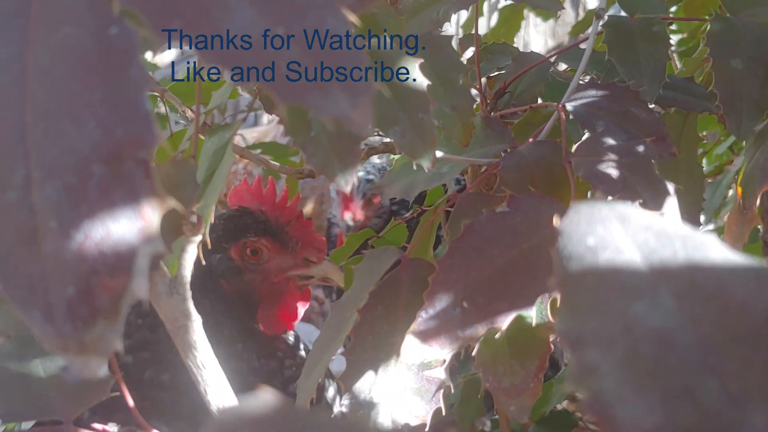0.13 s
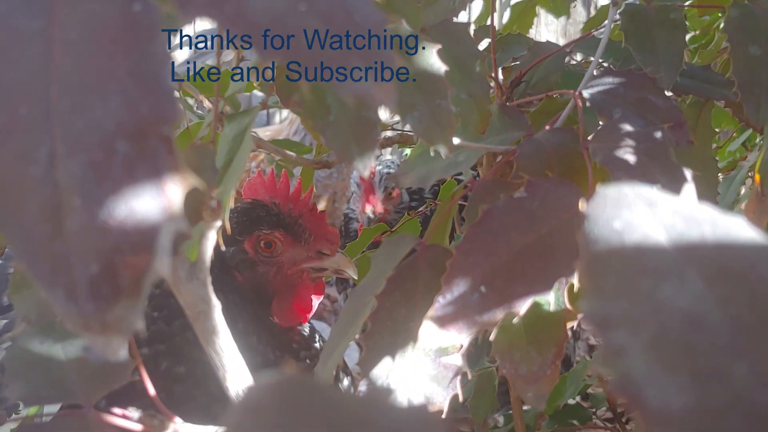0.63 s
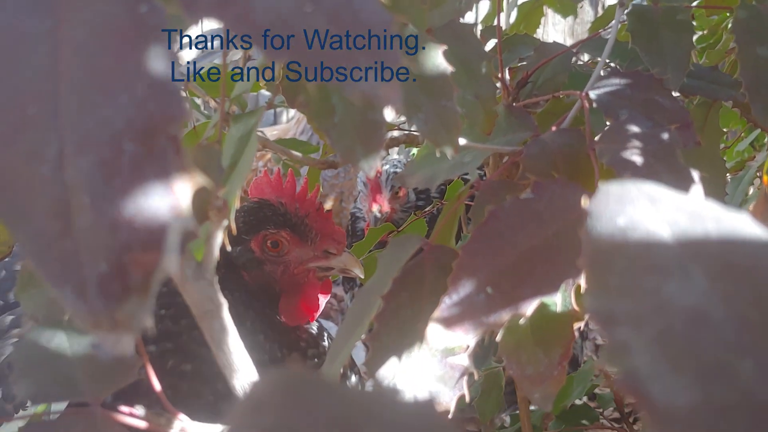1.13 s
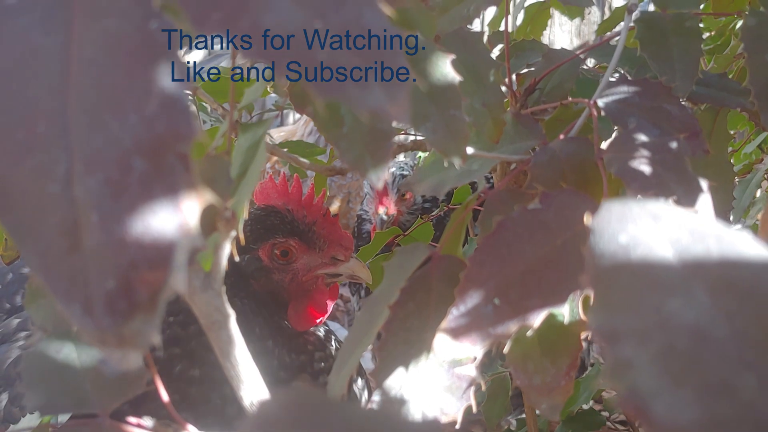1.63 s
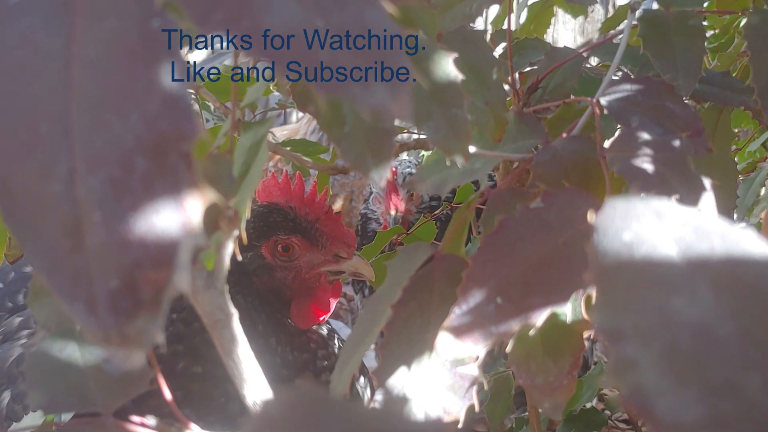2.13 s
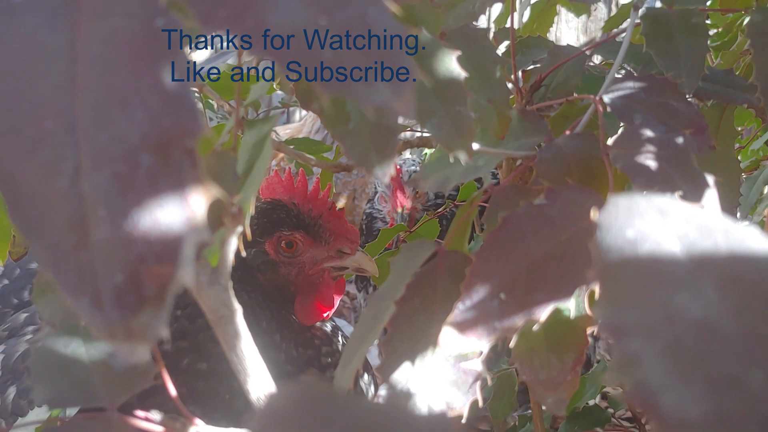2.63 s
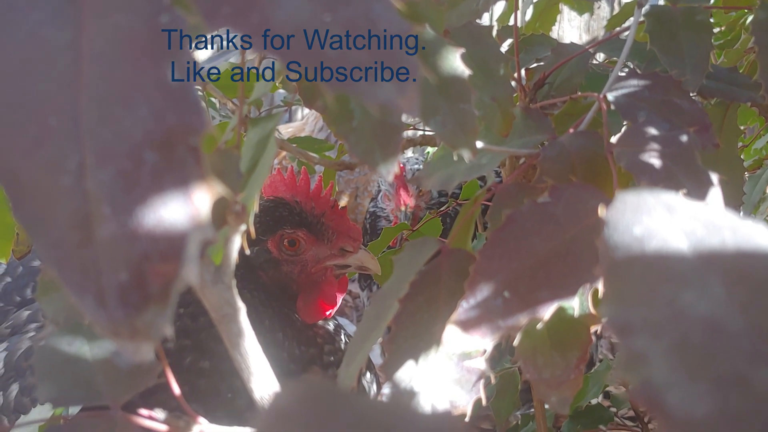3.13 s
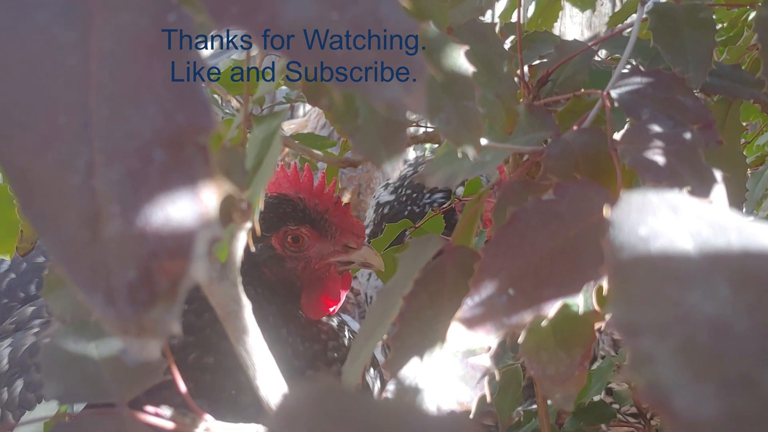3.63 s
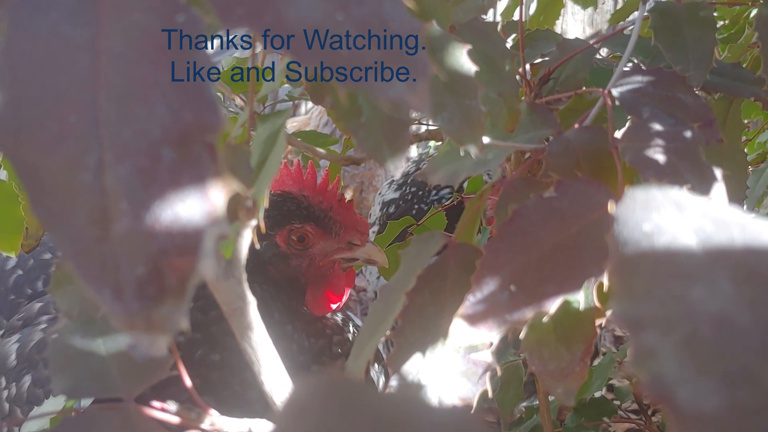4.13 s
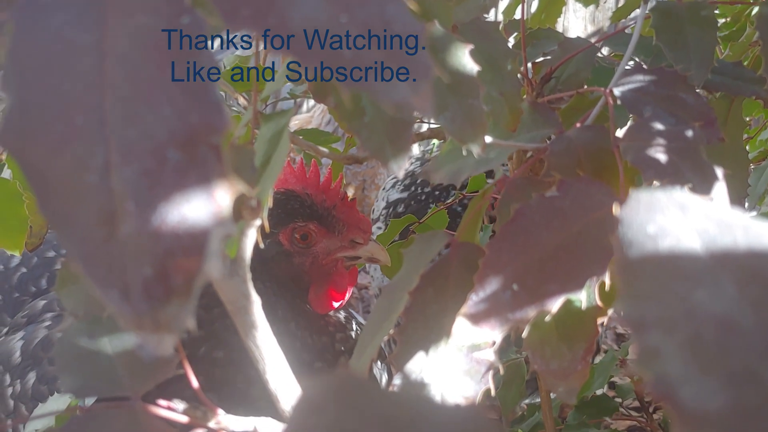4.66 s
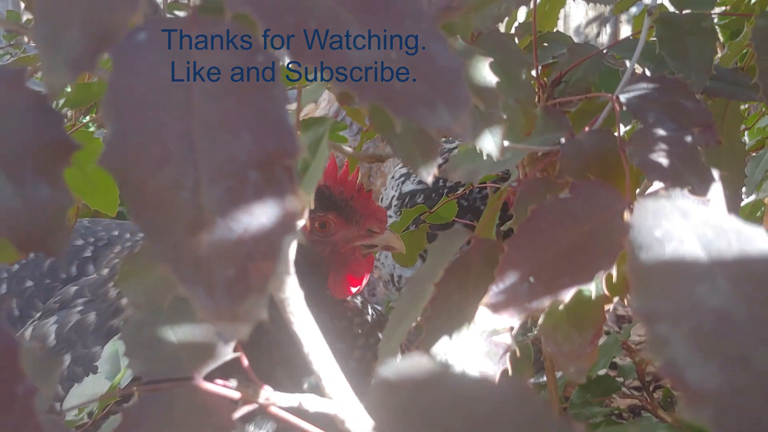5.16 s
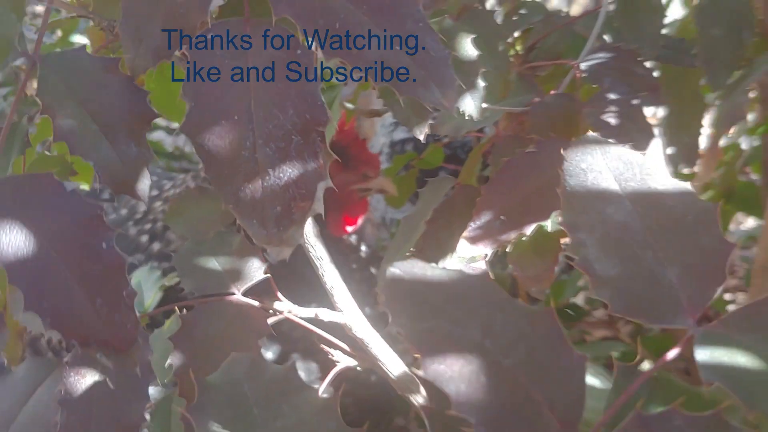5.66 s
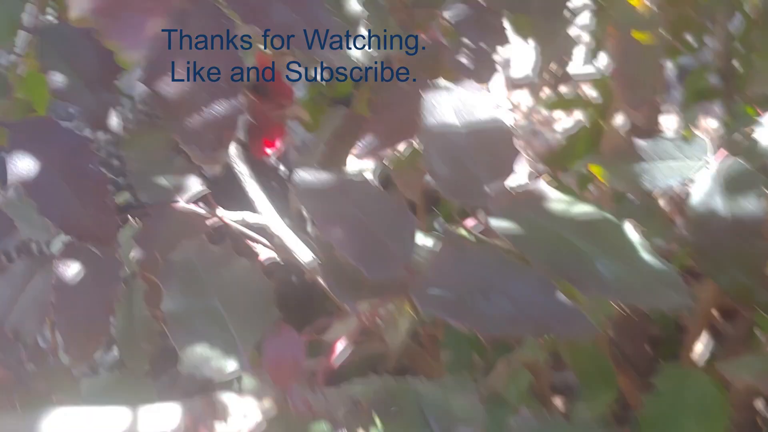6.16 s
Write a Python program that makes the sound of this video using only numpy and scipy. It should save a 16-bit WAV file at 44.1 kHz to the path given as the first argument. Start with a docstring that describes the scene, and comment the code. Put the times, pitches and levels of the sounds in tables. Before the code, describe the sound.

Outdoors inside a bush, very close stereo microphones pick up faint rumble and hiss with sparse, crisp leaf ticks, mostly to the right. The middle is nearly quiet, with tiny rustling swells. Near the end the camera pulls back: leaves scrape and snap loudly, and stems thump and drag over its body until the close.

```python
"""Stiff leaves brush, tick and snap, mostly near the right of two far-apart microphones on a small camera in a bush:
uneven noise makes the brushing, short dying bursts of noise and ringing tones make the snaps.
Late on, stems drag and knock over the body as it is pulled back: low lumpy noise and low ringing bursts.
Under it lie a rumble and a faint hiss of filtered noise, louder at the start and end and in short swells between.
A few faint pips are soft-edged sine tones."""
import sys
import numpy as np
from scipy import signal
from scipy.fft import rfft, irfft, next_fast_len
from scipy.io import wavfile
from scipy.ndimage import uniform_filter1d, map_coordinates

SR = 44100
rng = np.random.default_rng(int(sys.argv[2]) if len(sys.argv) > 2 else 0)


def store_pcm(level_fs):
    """Save levels as 16-bit WAV."""
    pcm = np.round(np.clip(level_fs, -1, 1) * 32767).astype(np.int16)
    wavfile.write(sys.argv[1], SR, np.atleast_2d(pcm).T)


def makeup_ratio(level_db):
    """Linear amplitude ratio for a level in decibels (20 dB per factor of ten)."""
    decades = np.asarray(level_db, float) / 20
    return 10 ** decades


N = 276948  # length in samples


def unit(x):
    """Scale each channel to an rms (average strength) of 1."""
    return x / np.sqrt(np.mean(x ** 2, axis=-1, keepdims=True) + 1e-20)


def along(points, hz):
    """Read a curve of (f/Hz, value) points at the given frequencies, on a log frequency axis."""
    f, value = np.transpose(points)
    return np.interp(np.log(hz + 1), np.log(f + 1), value)


def curves(rows):
    """Join the points of each column after the time by straight lines, one value per sample."""
    s, *columns = np.transpose(rows)
    return [np.interp(np.arange(N) / SR, s, column) for column in columns]


def wobble(rate):
    """A smooth random curve per channel, drawn through rate random points a second."""
    knots = rng.standard_normal((2, int(N * rate / SR) + 4))
    position = np.arange(N) * rate / SR
    return np.array([map_coordinates(k, [position]) for k in knots])


def coloured(x, response):
    """Filter x by an impulse response, keeping its length."""
    return signal.fftconvolve(x, response, axes=1)[:, :x.shape[1]]


def kernel(rows):
    """Turn (f/Hz, level/dB, ..) rows into one filter of unit energy per level column, starting at once."""
    size = 4096
    hz, *columns = np.transpose(rows)
    bins_hz = np.fft.rfftfreq(size, 1 / SR)
    db = [along(np.transpose([hz, column]), bins_hz) for column in columns]
    # folding the cepstrum (the spectrum of the log spectrum) makes the filter minimum phase
    cepstrum = irfft(np.log(makeup_ratio(np.array(db)) + 1e-6))
    cepstrum[:, 1:size // 2] *= 2
    cepstrum[:, size // 2 + 1:] = 0
    response = irfft(np.exp(rfft(cepstrum)))
    return response / np.linalg.norm(response, axis=1, keepdims=True)


def patchy(patch_db):
    """Noise whose gain wanders in patches of some 15 ms by 1.5 kHz, at rms 1."""
    z = signal.stft(rng.standard_normal((2, N)), nperseg=256)[2]
    field = uniform_filter1d(rng.standard_normal(z.shape), size=9, axis=1)  # smooth over frequency
    field = uniform_filter1d(field, size=5, axis=2)  # smooth over time
    gain = makeup_ratio(patch_db * field / field.std())
    return unit(signal.istft(z * gain, nperseg=256)[1][:, :N])


def lift():
    """The rise of background and brushing in dB over time, with edges softened over 17 ms."""
    # swells: start t/s, end t/s, lift level/dB
    swells = [(-.1, 1.74, 10), (1.8, 1.835, 8), (1.94, 2.04, 9), (2.105, 2.19, 9), (2.26, 2.375, 10),
              (3.35, 3.39, 9), (3.585, 3.63, 7), (3.71, 3.76, 8), (3.8, 3.93, 3), (4.025, 4.06, 6),
              (4.21, 4.24, 7), (4.255, 4.31, 8), (4.735, 4.95, 6), (4.95, 6.4, 9)]
    t = np.arange(N) / SR
    steps = sum(db * ((t > start) & (t < end)) for start, end, db in swells)
    return uniform_filter1d(steps * 1., round(0.017 * SR))


def around(rows, under_db, rise, fall):
    """A hump of power round every event, following its loudness at each microphone; rise and fall in s."""
    t = np.arange(N) / SR
    power = 0
    for s, left_db, right_db, *_ in rows:
        peak = makeup_ratio(np.array([[left_db], [right_db]]) + under_db) ** 2
        power = power + peak * np.exp(-((t - s) / np.where(t < s, rise, fall)) ** 2)
    return power


def bursts(rows, response, ring_share, spread, width, crumb_db, tick, start):
    """Each row is a dying crack of noise with three rings scattered about its centre, trailed by crumbs."""
    out = np.zeros((2, N + SR))
    t = np.arange(SR // 8) / SR
    for s, left_db, right_db, hz, t60 in rows:
        t60 = np.clip(t60, .002, .15)
        fade = makeup_ratio(-60 * t / t60) * (1 - np.exp(-t / start))
        # crumbs: a fainter, longer tail whose level jumps every 64 samples
        jumps_db = 8.1 * np.repeat(rng.standard_normal(len(t) // 64 + 1), 64)[:len(t)]
        crumbs = makeup_ratio(crumb_db - 60 * t / (2.66 * t60) + jumps_db)
        edges_hz = [hz / width, min(hz * width, SR / 2.2)]
        band = signal.butter(2, edges_hz, "bandpass", fs=SR, output="sos")
        crack = unit(signal.sosfilt(band, rng.standard_normal((2, len(t)))))
        rings_hz = hz * np.exp(spread * rng.standard_normal((3, 1)))
        ring = np.sin(2 * np.pi * rings_hz * t).mean(axis=0)
        # the break itself is broadband
        first = tick * makeup_ratio(-60 * t / 0.0073) * rng.standard_normal((2, len(t)))
        blow = (fade + crumbs) * (1 - ring_share) * crack + ring_share * fade * ring + first
        blow = coloured(blow, response)
        blow /= np.abs(blow).max(axis=1, keepdims=True)
        out[:, round(s * SR):][:, :len(t)] += makeup_ratio(np.array([[left_db], [right_db]])) * blow
    return out[:, :N]


def crackle(rate, spread_db, t60):
    """Tiny random slips (rate a second), mostly small, each a dying puff of noise; the whole at rms 1."""
    size = makeup_ratio(spread_db * np.minimum(rng.exponential(size=(2, N)), 3.5))
    slips = size * (rng.random((2, N)) < rate / SR)
    fade = makeup_ratio(-60 * np.arange(SR // 20) / SR / t60)
    return unit(coloured(slips, fade[None]) * patchy(patch_db=4.0))


def lesser_snaps(level_db, count):
    """Random snap rows, denser and louder where the brushing is strong."""
    over_db, scatter_db = 11, 2.5  # typical peak over the brushing level, and its scatter
    centre_hz, scatter_octaves = 3500, 0.61
    typical_t60 = 0.03  # s, scattered below
    share = np.cumsum(makeup_ratio(0.5 * level_db[1]))  # the rate grows by 0.5 dB per dB of brushing
    luck = rng.standard_normal((count, 4))
    at = np.searchsorted(share / share[-1], rng.random(count))
    left_db, right_db = level_db[:, at] + over_db + scatter_db * luck[:, :2].T
    hz = np.clip(centre_hz * 2 ** (scatter_octaves * luck[:, 2]), 1200, 9000)
    t60 = typical_t60 * np.exp(0.5 * luck[:, 3])
    return np.transpose([at / SR, left_db, right_db, hz, t60])


def leaves():
    """Brushing is uneven friction plus crackle, duller when faint; single snaps stand on top."""
    # leaves brushing, before any lift: t/s, right level/dB, left level under right/dB
    brushing = [(0, -58, 6), (0.13, -60, 5), (0.2, -68, 7), (0.38, -65, 0), (0.47, -73, 7.5),
                (1.0, -75, 4.5), (1.4, -70.5, 4.5), (1.7, -75, 6.5), (2.0, -72, 3), (2.3, -77.5, 5),
                (3.3, -78, 1), (3.8, -70, 14), (4.2, -70.5, 8), (4.35, -80, 6), (4.7, -75, 5),
                (4.9, -55, 16), (5.1, -53, 12.5), (5.27, -49, 16), (5.4, -46, 2.5), (5.8, -47, 11),
                (5.87, -38, 8.5), (5.96, -47, 8), (6.15, -43, 10), (6.28, -44, 5)]
    # leaf snaps: t/s, left peak level/dB, right peak level/dB, centre f/Hz, 60 dB decay t/s
    snap_rows = [(0.085, -42, -56, 2480, 0.037), (0.121, -56, -50, 2480, 0.0061),
                 (0.2096, -48.5, -29.5, 6930, 0.019), (0.2908, -56, -32, 5540, 0.0058),
                 (0.3205, -59, -24.5, 5780, 0.014), (0.326, -58, -38, 3340, 0.11),
                 (0.373, -48, -28.5, 6680, 0.016), (0.3959, -35, -40, 4870, 0.0093),
                 (0.4349, -56, -30.5, 4950, 0.012), (0.4395, -53, -35.5, 6050, 0.017),
                 (0.5965, -40.5, -38, 3840, 0.012), (0.7919, -56, -33.5, 2310, 0.027),
                 (0.8239, -46, -27, 2760, 0.019), (0.8559, -42, -30, 4100, 0.02),
                 (0.8907, -38, -31, 3780, 0.017), (1.0477, -52, -28.5, 5400, 0.0045),
                 (1.095, -34.5, -34, 2570, 0.016), (1.1054, -46, -40, 2144, 0.08),
                 (1.6241, -48.5, -41.5, 1580, 0.07), (2.1176, -64, -35.5, 7250, 0.021),
                 (2.2776, -51, -30, 7160, 0.022), (2.488, -63, -53, 3350, 0.015),
                 (2.7028, -67, -52, 6700, 0.014), (3.072, -59, -61, 3760, 0.018),
                 (3.3585, -58, -38.5, 7220, 0.025), (3.3734, -62, -46, 3440, 0.011),
                 (3.5906, -53, -47.5, 3000, 0.013), (3.6096, -54, -36, 7120, 0.017),
                 (3.7386, -43, -31, 2480, 0.023), (3.8943, -54, -44, 1830, 0.0086),
                 (4.0378, -68, -38, 6300, 0.028), (4.1153, -59, -43, 5230, 0.015),
                 (4.1974, -52, -46, 5300, 0.0078), (4.2229, -60, -39, 6230, 0.034),
                 (4.2792, -45.5, -39, 6500, 0.034), (4.2965, -58, -44.5, 3200, 0.0087),
                 (4.7551, -38, -30.5, 1820, 0.0056), (4.7772, -31, -30.5, 4160, 0.021),
                 (4.8251, -44, -33.5, 3240, 0.039), (4.8643, -33, -29.5, 5280, 0.079),
                 (4.8733, -36, -27.5, 1890, 0.033), (4.9306, -43, -14, 7760, 0.013),
                 (4.9435, -39, -20, 5340, 0.0047), (4.9707, -37, -22, 4620, 0.026),
                 (5.058, -39, -22, 6280, 0.014), (5.082, -38, -19.5, 6250, 0.015),
                 (5.222, -41, -42, 4250, 0.004), (5.239, -48, -19.5, 5700, 0.0078),
                 (5.25, -40, -21, 5070, 0.0067), (5.3068, -37, -19, 5300, 0.056),
                 (5.3231, -31, -14, 3920, 0.0081), (5.334, -17, -31, 4000, 0.011),
                 (5.3621, -20, -7, 4100, 0.0041), (5.3756, -14, -14, 3730, 0.019),
                 (5.4357, -13, -19, 1940, 0.0075), (5.482, -18.5, -22, 3500, 0.069),
                 (5.5163, -35, -16.5, 6270, 0.0057), (5.5354, -22, -7.5, 3140, 0.02),
                 (5.5512, -34, -16.5, 3660, 0.032), (5.5804, -16.5, -12.5, 4500, 0.011),
                 (5.6467, -20, -11.5, 4700, 0.011), (5.669, -30, -16.5, 7000, 0.0094),
                 (5.6839, -16, -33, 1530, 0.0084), (5.6962, -18.5, -16.5, 1990, 0.0084),
                 (5.701, -29, -18, 7000, 0.02), (5.7485, -19, -13, 2230, 0.018),
                 (5.754, -27, -12.5, 2880, 0.0097), (5.7777, -40, -18, 2680, 0.011),
                 (5.8502, -31, -11.5, 4680, 0.014), (5.872, -15, -7.5, 3380, 0.011),
                 (5.8811, -41, -15, 3080, 0.0082), (5.9212, -29, -18, 6200, 0.046),
                 (5.9532, -24, -20, 4200, 0.024), (5.9762, -14.5, -24, 5300, 0.025),
                 (5.9824, -20.5, -19.5, 3610, 0.061), (6.0275, -32, -24, 6100, 0.014),
                 (6.0524, -34, -24, 2040, 0.056), (6.1072, -29, -21.5, 5370, 0.015),
                 (6.1541, -27, -15, 3180, 0.029), (6.2254, -23, -14, 2090, 0.038),
                 (6.2627, -21.5, -14, 4700, 0.0025)]
    # leaf sound through each microphone port, relative: f/Hz, left level/dB, right level/dB
    port_colour = [(106, -31, -39), (306, 0, -5), (1270, -2.5, -9), (1665, -10.5, 0), (1980, -12.5, 1),
                   (3080, -6.5, -6), (4500, -4.5, -7), (6200, -3, -8.5), (7000, -10.5, 2.5),
                   (8070, -24, -6), (8660, -13.5, -17), (12080, -8, -15.5), (12560, -24, -19),
                   (15040, -36, -22.5), (16000, -55, -100)]
    right_db, under_db = curves(brushing)
    level_db = np.array([right_db - under_db, right_db]) + lift()
    friction = makeup_ratio(0.55 * wobble(35)) * patchy(patch_db=1.0)
    brush = unit(0.6 * unit(friction) + 0.71 * crackle(rate=380, spread_db=4.0, t60=0.011))
    ports = kernel(port_colour)
    brush = coloured(brush, ports)

    # dullness: lows go up and highs down by this much, more as the brushing gets fainter
    dull_db = 0.88 + 0.0396 * (-35.5 - right_db)
    low = signal.sosfiltfilt(signal.butter(2, 4000, fs=SR, output="sos"), brush)
    brush = makeup_ratio(dull_db) * low + makeup_ratio(-dull_db) * (brush - low)

    snaps = bursts(snap_rows, ports, ring_share=0.61, spread=0.286, width=2.1,
                   crumb_db=-16.5, tick=0.57, start=0.00021)
    snaps += bursts(lesser_snaps(level_db, count=80), ports, ring_share=0.45, spread=0.151, width=1.464,
                    crumb_db=-14, tick=0.058, start=0.00054)
    # a leaf that snaps also rustles, well under its peak
    stir_power = around(snap_rows, under_db=-27.5, rise=0.0058, fall=0.032)
    return np.sqrt(makeup_ratio(level_db) ** 2 + stir_power) * brush + snaps


def air():
    """Rumble is nearly the same at both microphones, hiss is not; both are filtered noise and lift together."""
    # rumble colour, relative: f/Hz, level per Hz/dB
    rumble_colour = [(15, -48), (25, -13), (48, -3), (124, -2.5), (167, -11.5), (221, -16), (330, -29.5),
                     (430, -53), (730, -120)]
    # hiss colour, relative: f/Hz, level per Hz/dB
    hiss_colour = [(150, -24.5), (250, -11), (414, -8.5), (1280, -13.5), (1950, -18.5), (2760, -28),
                   (7190, -57), (8700, -84), (12100, -41), (16000, -55)]
    # left-right likeness: f/Hz, likeness (1 same, 0 unrelated, -1 opposite)
    likeness = [(60, 0.94), (180, 0.9), (550, 0.32), (1650, -0.69), (4970, 0.72), (15000, -0.36)]
    rumble_db, hiss_db = -58.5, -72.5  # rms per microphone before wobble and lift
    size = next_fast_len(N)
    alike = np.clip(along(likeness, np.fft.rfftfreq(size, 1 / SR)), -1, 1)
    turn = np.arccos(alike) / 2  # shares noise between the common and the opposite part
    mid, side = rfft(rng.standard_normal((2, size))) * [np.cos(turn), np.sin(turn)]
    pair = irfft(np.array([mid + side, mid - side]), size)[:, :N]
    rumble = makeup_ratio(rumble_db + 1.36 * wobble(4.8)[0]) * coloured(pair, kernel(rumble_colour))
    hiss = makeup_ratio(hiss_db) * coloured(pair, kernel(hiss_colour))
    return makeup_ratio(lift()) * (rumble + hiss)


def pips():
    """Faint short sine tones that swell and fade along a bell curve."""
    # pips: t/s, left peak level/dB, right peak level/dB, f/Hz, half length t/s
    pip_rows = [(.048, -64, -44, 1020, .009), (1.105, -58, -50, 1150, .007), (3.45, -80, -70, 1680, .012)]
    out = np.zeros((2, N))
    for s, left_db, right_db, hz, half in pip_rows:
        t = np.arange(N) / SR - s
        tone = np.exp(-(t / half) ** 2) * np.sin(2 * np.pi * hz * t)
        out += makeup_ratio(np.array([[left_db], [right_db]])) * tone
    return out


def stems():
    """Stems rub and hit the body, which carries a low lumpy drag and single knocks."""
    # stems dragging on the body: t/s, level/dB
    dragging = [(0, -120), (4.8, -105), (4.9, -80), (5.15, -68), (5.38, -41.5), (5.6, -45), (5.9, -57),
                (5.97, -55), (6.28, -58)]
    # drag colour through the body, relative: f/Hz, level per Hz/dB
    body_colour = [(24, -45), (40, 5), (91, -3.5), (234, 2.5), (306, -12.5), (437, -7), (1200, -31),
                   (1560, -39), (2640, -120)]
    # knocks: t/s, left peak level/dB, right peak level/dB, centre f/Hz, 60 dB decay t/s (0.15 at most is used)
    knock_rows = [(4.9294, -65, -32, 320, 0.04), (5.0888, -44, -34, 410, 0.18),
                  (5.1073, -39, -62, 146, 0.17), (5.3047, -43, -29, 300, 0.027),
                  (5.3741, -46, -26.5, 420, 0.03), (5.4355, -12.5, -41, 418, 0.019),
                  (5.445, -21, -53, 344, 0.046), (5.4659, -16, -47, 243, 0.054),
                  (5.4753, -19, -48, 182, 0.084), (5.5339, -42, -19.5, 329, 0.037),
                  (5.545, -44, -22.5, 66, 0.12), (5.686, -12, -45, 748, 0.041),
                  (5.6956, -8, -49, 193, 0.062), (5.7174, -23.5, -43, 300, 0.074),
                  (5.7463, -17, -35, 240, 0.041), (5.758, -26, -35, 223, 0.036),
                  (5.8833, -39, -26, 180, 0.12), (6.0013, -30, -53, 191, 0.029),
                  (6.2262, -40, -39, 656, 0.017), (6.2569, -32, -58, 183, 0.0068),
                  (6.262, -25.5, -56, 60.4, 0.17)]
    level_db, = curves(dragging)
    lumpy = unit(makeup_ratio(2.1 * wobble(30)) * rng.standard_normal((2, N)))
    drag = coloured(lumpy, kernel(body_colour))
    no_filter = np.ones((1, 1))
    knocks = bursts(knock_rows, no_filter, ring_share=0.73, spread=0.072, width=3.63,
                    crumb_db=-17, tick=0, start=0.0009)
    # a stem that knocks also slides, well under its peak
    slide_power = around(knock_rows, under_db=-26.5, rise=0.023, fall=0.053)
    return np.sqrt(makeup_ratio(level_db) ** 2 + slide_power) * drag + knocks


def scene():
    """All sources at the two microphones."""
    return leaves() + air() + pips() + stems()


def top_cut(x):
    """Nothing passes above the cut-off."""
    return signal.sosfilt(signal.butter(12, 16480, fs=SR, output="sos"), x)


def record(dry):
    """The finished mix as the camera stores it."""
    return top_cut(dry)


dry = scene()
out = record(dry)
store_pcm(out)
```